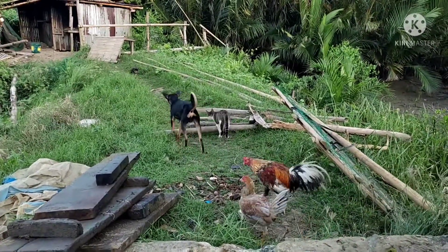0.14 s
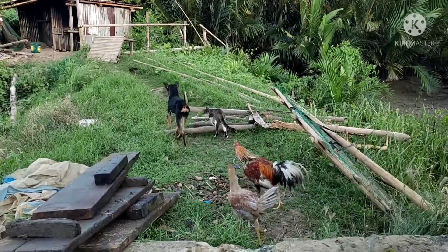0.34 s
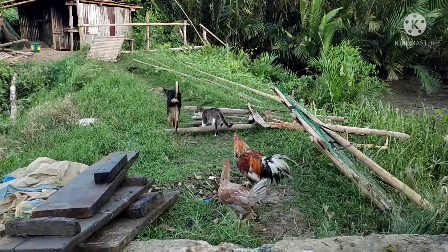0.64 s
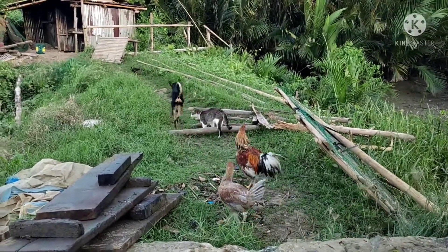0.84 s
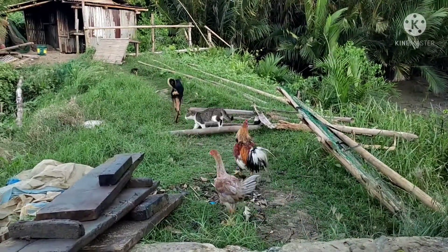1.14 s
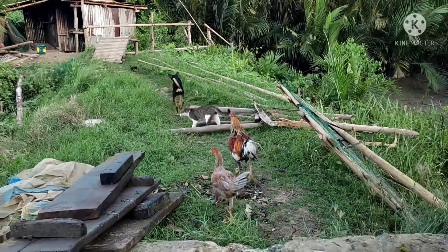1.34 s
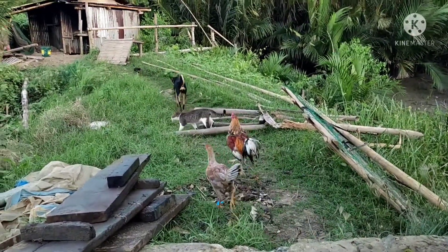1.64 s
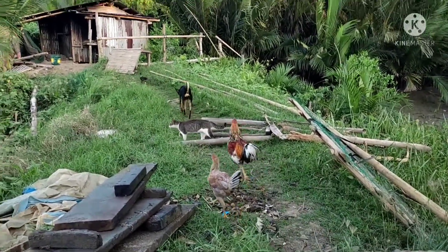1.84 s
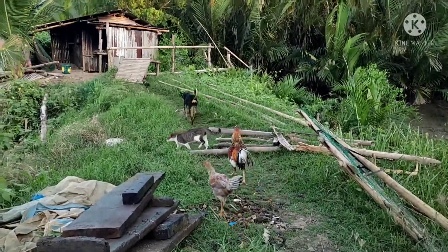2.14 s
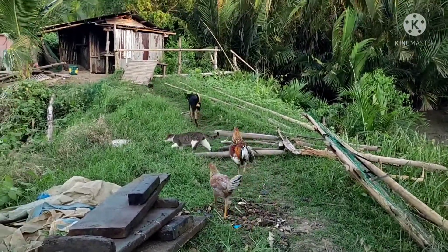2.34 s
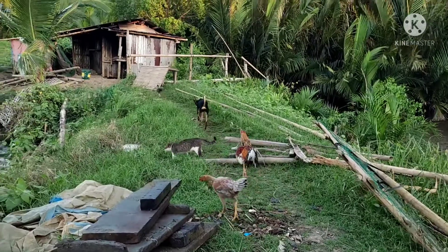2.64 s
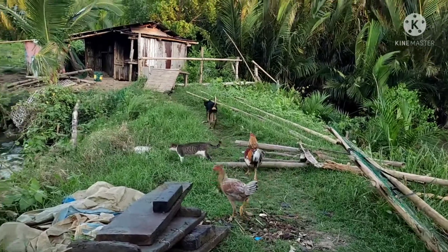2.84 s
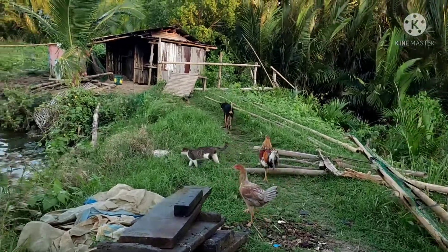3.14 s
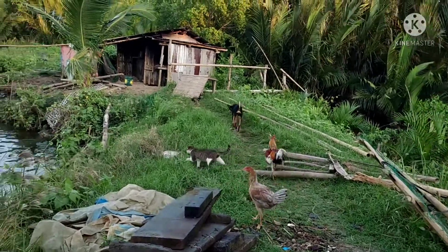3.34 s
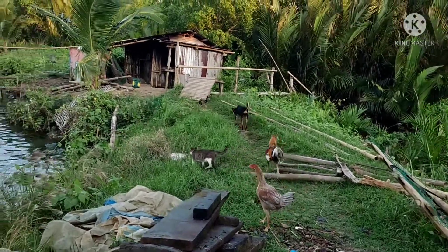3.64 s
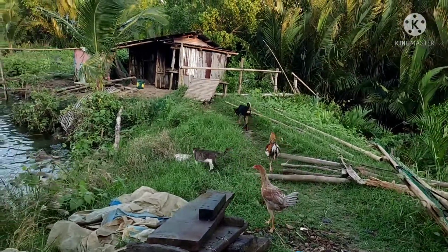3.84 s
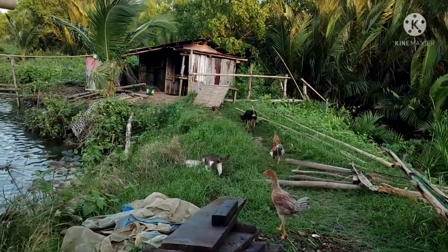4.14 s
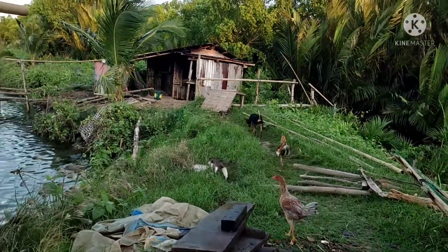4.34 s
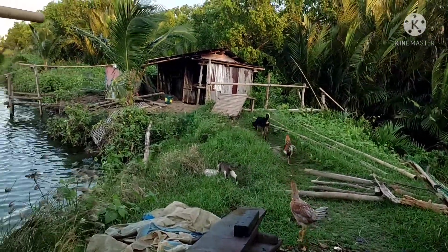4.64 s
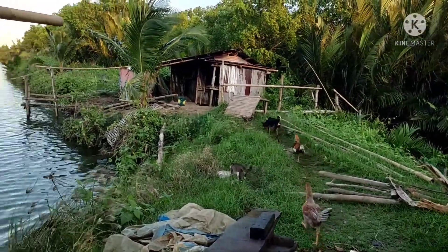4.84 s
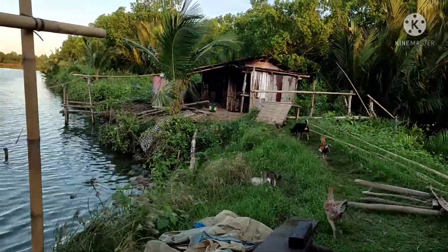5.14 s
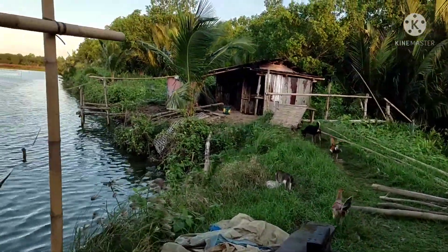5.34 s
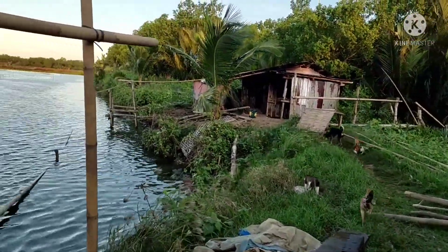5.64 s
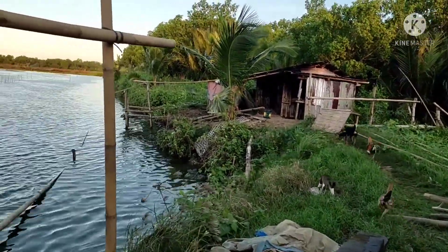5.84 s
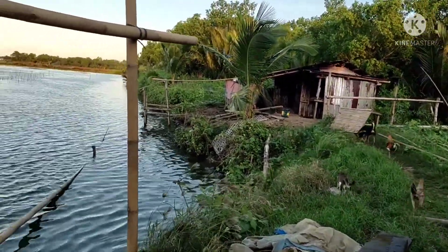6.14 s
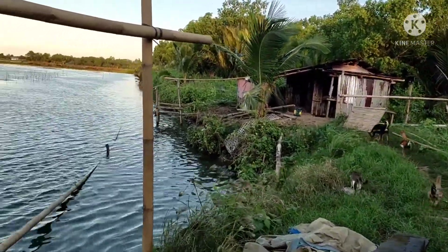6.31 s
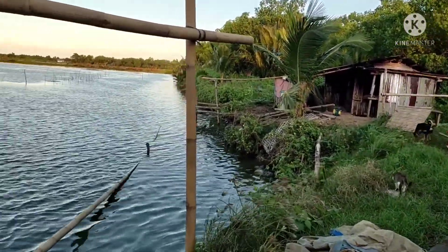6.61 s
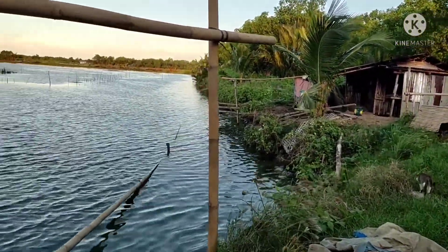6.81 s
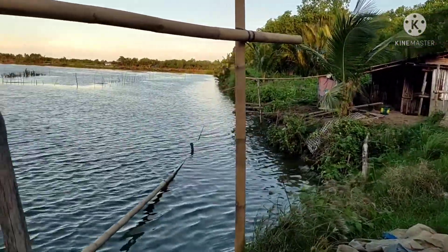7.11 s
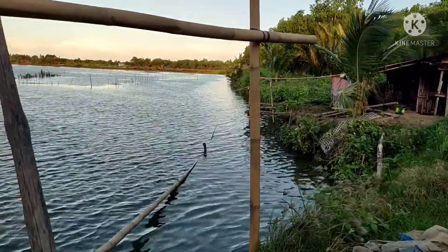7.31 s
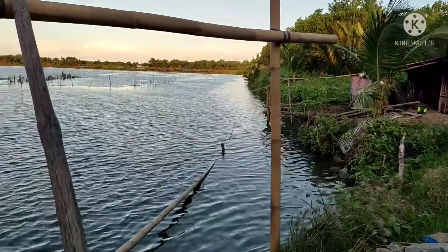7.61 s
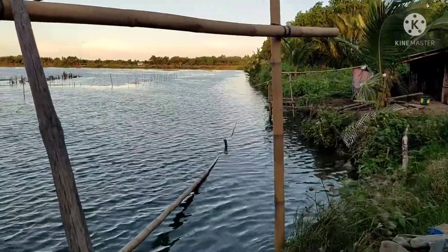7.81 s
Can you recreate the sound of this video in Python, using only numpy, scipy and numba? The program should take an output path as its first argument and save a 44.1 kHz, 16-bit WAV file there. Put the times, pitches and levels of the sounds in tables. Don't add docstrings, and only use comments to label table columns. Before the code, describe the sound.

From the first moment to the end at about 8 seconds, water rushes without a break through an open pond gate some metres away. Its body is a bubbly, hollow mid-low roar, with brighter splashing and fine spray hiss above, shaken by small quick surges. Wind presses on the bare phone microphone all along: deep rumbling, fluttering and irregular soft thumps several times a second, with a stronger gust around 1.5 seconds and heavy bumps near 3.3 and 6.2. Wet gulps of trapped air are sparse at first, clearer at 3.5 and 4.1, then crowd together from 5 to 7 seconds. The flow swells briefly near 3.4 and 5.9. From about 4 seconds the phone turns away, softening the splash by degrees while higher wind flutter grows a little. Far behind, insects blend into a faint, very high throbbing shrill. Open air, only short nearby reflections, no ending.

```python
import sys
import numpy as np
from scipy import signal
from scipy.fft import rfft, irfft, next_fast_len
from scipy.io import wavfile
from scipy.ndimage import uniform_filter1d
from numba import njit

SR = 44100
rng = np.random.default_rng(int(sys.argv[2]) if len(sys.argv) > 2 else 0)


def dump_mix(stems):
    frames = np.atleast_2d(stems).T
    limited = np.clip(frames, -1, 1)
    pcm = np.round(limited * 32767).astype(np.int16)
    wavfile.write(sys.argv[1], SR, pcm)


def boost_factor(decibels):
    exponent = np.asarray(decibels, float) / 20
    return 10 ** exponent


N = 351477

# t/s, turn/0-1
PHONE_TURN = [(0, 0.01), (.4, 0.11), (.9, 0.07), (1.9, 0.09), (2.7, 0), (3.6, 0.03), (4.4, 0.23), (5, 0.37),
              (5.6, 0.56), (6.1, 0.75), (6.7, 0.83), (7.3, 0.99), (7.97, 1)]

# t/s, level/dB
GATE_FLOW = [(0, 1), (0.5, -1.5), (1.2, 0.5), (2, 0.7), (3.1, -1.5), (3.4, 3.5), (3.9, 0.9), (4.6, 2.2),
             (5.5, 0), (5.85, 3), (6.4, 0.5), (6.9, 1.5), (7.4, -1), (7.97, -0.7)]
# t/s, level/dB
SLOSHES = [(0.47, -12), (0.71, 2), (0.86, -10), (1.46, 4.1), (1.64, -6), (1.8, 1.5), (1.94, -1), (2.09, -3),
           (2.57, -16), (2.74, 7), (3.1, -7), (3.28, 5), (3.65, -5), (3.86, 5.5), (4.43, -8), (4.67, -2.5),
           (5.01, -16), (5.18, 1.5), (5.62, -16), (5.98, -10), (6.2, 1.5), (7.06, 7), (7.23, -2), (7.53, 5),
           (7.67, -5), (7.77, 6)]
# t/s, level/dB
HEAVES = [(0.3, 1), (0.76, 3), (0.94, -3), (1.09, 2.5), (1.28, -1), (1.65, -2), (3.04, 2.5), (3.84, -2.8),
          (4.12, 2.5), (4.35, -0.5), (4.57, 1.5), (5.82, -2), (6.3, 2.8), (6.41, -0.8), (6.52, 2.5),
          (6.63, -2.5), (6.82, -0.5), (7.13, -1), (7.45, 1.5), (7.73, -2)]
# t/s, level/dB
SLAPS = [(.1, -2.5), (.5, -2), (.78, 1), (1.5, 0.5), (1.77, -3), (2.0, 1.5), (2.3, 0.5), (2.61, 2.5),
         (2.85, 1.5), (3.1, 1.5), (3.27, -1), (4.24, 1.5), (4.79, 0), (4.89, -3), (5.36, 0), (5.58, -0.5),
         (5.81, 1.5), (6.11, 0), (6.41, -0.5), (6.62, 0.5), (6.71, -1), (7.29, 0), (7.39, 5.5), (7.65, -1),
         (7.88, 2.5)]
# f/Hz, level/dB per Hz
ROAR_COLOUR = [(380, -12), (470, -5.5), (560, 1), (700, 1.5), (900, -1), (1050, -3.5), (1400, -9.5),
               (2000, -44)]
# f/Hz, level/dB per Hz
HOLLOW_COLOUR = [(465, -30), (504, -5), (523, 0), (543, -5), (585, -30)]
# f/Hz, level/dB per Hz
UPPER_HOLLOW_COLOUR = [(680, -30), (710, -5), (724, 0), (740, -5), (775, -30)]
# f/Hz, level/dB per Hz
SPLASH_COLOUR = [(800, -20), (1100, -2), (1300, 0.5), (1800, -1.5), (2300, -5), (2700, -12.5), (2800, -15),
                 (3600, -28)]
# f/Hz, level/dB per Hz
SPRAY_COLOUR = [(1500, -21), (2200, 7), (3000, 2.5), (3300, 4.5), (3540, 6.5), (3565, .5), (4800, -1.5),
                (5800, 0.5), (6200, -12.5)]
# t/s, centre f/Hz, depth/0-1
HAND_SHADE = [
    (0, 3950, 0),
    (2, 3930, 0.1),
    (3.5, 4080, .4),
    (4.7, 4690, 0.5),
    (5.7, 5280, 0.4),
    (6.5, 5270, 0.5),
    (7.97, 5060, 0.5),
]
# t/s, peak level/dB, f/Hz
GULPS = [(0.13, -28, 650), (0.961, -23, 520), (1.891, -21.5, 776), (1.994, -30.5, 670), (2.107, -20, 735),
         (2.459, -26, 550), (2.923, -22, 715), (3.288, -18.5, 540), (3.524, -16, 513), (3.686, -23, 720),
         (4.096, -14.5, 594), (4.385, -24, 616), (4.489, -16, 940), (4.697, -22, 576), (5.088, -19, 583),
         (5.3, -21, 725), (5.388, -18, 860), (5.578, -17, 870), (5.639, -37.5, 660), (5.733, -21, 577),
         (5.8, -18, 543), (5.838, -14, 595), (5.943, -19, 610), (5.985, -23.5, 534), (6.291, -19.5, 570),
         (6.493, -15.5, 560), (6.738, -19, 630), (6.825, -19, 627), (7.045, -26, 520), (7.63, -24, 700),
         (7.78, -25, 560), (7.9, -21, 640)]
# delay t/s, signed gain/1
ECHOES = [(.00342, .1), (.00459, -.12), (.00576, .06), (.00634, -.06), (.00765, .09), (.00962, .12)]

# centre f/Hz, level/dB, response/dB per breeze dB, change at full turn/dB
WIND_LAYERS = [
    (65, -34, 1.06, -4),
    (124, -30, 0.65, -0.86),
    (256, -39, 1.47, 3.5),
    (385, -45, 0.66, 4.5),
]
# t/s, level/dB
BREEZE = [(0, 0.0), (0.9, -1.5), (1.15, -0.5), (1.5, 6), (2.1, -2.6), (2.6, 0), (3.35, 1), (3.75, -1.5),
          (4.2, -1), (4.7, -3.5), (5.3, -1.7), (6.2, 1.0), (7.2, -1.5), (7.5, -1), (7.97, -0.4)]
# t/s, level/dB, eddy f/Hz, length t/s
GUSTS = [(0.18, 4, 60, 0.04), (0.22, 4.5, 320, 0.034), (0.59, 9, 210, 0.038), (0.75, 7, 170, 0.021),
         (1.002, 3.5, 60, 0.061), (1.34, 2, 320, 0.08), (1.385, 7.5, 90, 0.037), (1.77, 6, 60, 0.027),
         (2.073, 6, 110, 0.027), (2.193, 5, 60, 0.04), (2.44, 8, 209, 0.026), (2.58, 1.5, 135, 0.059),
         (2.747, 0.5, 200, 0.051), (0.036, 2.5, 150, 0.044), (2.85, 6.5, 75, 0.047),
         (3.305, 5.5, 60, 0.042), (3.53, 7.5, 400, 0.032), (3.805, 3, 110, 0.066), (4.01, 2.5, 60, 0.084),
         (4.34, 3, 135, 0.14), (4.817, 7.5, 260, 0.09), (4.97, 6.5, 110, 0.057), (5.275, 7.5, 60, 0.048),
         (5.863, 3.5, 135, 0.098), (6.13, 8, 90, 0.035), (6.51, 6.5, 170, 0.024), (7.008, 5.5, 318, 0.092),
         (7.494, 8.5, 170, 0.04), (7.58, 3, 60, 0.055), (0.13, 6, 200, 0.046), (0.95, 4, 140, 0.073),
         (1.32, 1, 400, .05), (3.19, 4.5, 200, .05), (3.344, 2, 200, .04), (3.532, 6, 60, 0.038),
         (4.02, 3, 290, .05), (4.3, 2, 290, 0.041), (5.333, 2, 290, 0.033), (5.52, 4, 60, .05),
         (5.777, 2, 290, .05), (6.74, 5, 400, .05), (7.163, 5, 400, 0.037), (7.25, 4, 62, .05),
         (7.34, 4.5, 200, .05), (7.87, 2, 60, 0.052)]
# t/s, level/dB, eddy f/Hz,
# length t/s
LULLS = [(0.06, -10, 136, 0.023), (0.77, 0, 60, 0.04), (0.91, -6.5, 135, 0.044), (1.32, -5.5, 76, 0.16),
         (1.492, -7.5, 60, 0.026), (1.635, -1.5, 323, 0.034), (2.003, -1.5, 60, 0.04),
         (2.23, -0.5, 206, 0.06), (2.288, -5, 60, 0.043), (2.71, -6.5, 208, 0.022), (3.104, -1, 400, 0.04),
         (3.114, -4, 110, 0.033), (3.647, -2, 320, 0.036), (3.725, -6, 60, 0.036), (3.94, -4, 260, 0.047),
         (4.275, 3, 59.6, 0.04), (4.437, -11, 260, 0.023), (4.7, -3, 75, 0.16), (5.09, -6.5, 90, 0.04),
         (5.596, -4.5, 400, 0.055), (6.012, -10.5, 133, 0.033), (6.037, -5, 320, 0.027),
         (6.257, 4, 60, 0.037), (6.39, -3, 400, 0.038), (6.68, -4, 210, 0.096), (6.83, -2, 60, 0.04),
         (7.0, -6, 60, 0.033), (7.43, 1, 59.6, 0.04), (7.675, -4, 170, 0.079), (0.11, -6, 95, 0.046),
         (1.46, -2, 200, .06), (2.05, -1, 290, 0.045), (2.9, -1.5, 290, 0.044), (3.224, -2, 95, .04),
         (5.1, -1, 290, .04), (5.67, -3, 200, 0.038), (6.205, -1.5, 200, 0.043), (7.08, -1.5, 290, 0.041),
         (7.49, -2, 100, .04), (7.85, 0, 290, 0.054)]
# f/Hz, level/dB per Hz
BUFFET_COLOUR = [(15, -47), (22, -37.5), (33, -22.5), (52, -3.5), (75, 1), (95, -6.5), (130, -26.5)]
# f/Hz, level/dB per Hz
RUMBLE_COLOUR = [(55, -29), (80, -1), (100, 0.5), (129, 1), (200, -4), (260, -13.5), (340, -28)]
# f/Hz, level/dB per Hz
FLUTTER_COLOUR = [(150, -14.5), (215, 5.5), (260, 1), (320, 0.5), (400, -27)]
# f/Hz, level/dB per Hz
WHIR_COLOUR = [(270, -24), (335, -2.5), (400, -4.5), (460, -3), (560, -30)]
# t/s, peak level/dB, f/Hz
THUMPS = [(0.168, -17, 81), (0.44, -14.5, 110), (0.581, -20.5, 217), (0.653, -17.5, 110), (0.75, -21, 140),
          (0.894, -20, 78), (1.021, -17, 89), (1.376, -18.1, 94), (1.643, -13.5, 92), (1.769, -13.5, 65),
          (2.068, -15.5, 133), (2.2, -16.5, 74.5), (2.445, -13, 118), (2.549, -16, 96.5),
          (2.622, -14.5, 135), (2.789, -15.5, 86.4), (2.842, -15.5, 120), (2.918, -20, 110),
          (3.032, -17, 116), (3.348, -12, 95), (3.5, -14, 119), (3.814, -18.5, 105), (3.978, -19, 123),
          (4.273, -15.5, 113), (4.536, -18, 95), (4.69, -18.5, 173), (4.952, -16, 97), (5.004, -20.7, 110),
          (5.163, -21.8, 118), (5.247, -21.5, 124), (5.601, -20, 128), (5.731, -18, 96), (5.865, -15, 104),
          (6.088, -17, 94), (6.157, -12.5, 111), (6.256, -16, 139), (6.47, -16, 136), (6.523, -14.5, 111),
          (6.692, -18, 124), (6.87, -19, 102), (7.121, -20, 83), (7.24, -19, 167), (7.399, -15, 140),
          (7.526, -13.5, 129), (7.805, -20.5, 125), (7.894, -21, 118)]

# t/s, level/dB
CHORUS_LEVEL = [(0, -49.9), (1, -50), (1.6, -49.5), (2, -51), (3.3, -49.5), (4.4, -49.5), (4.9, -51.5),
                (5.6, -49.5), (6.4, -48), (6.8, -49.5), (7.25, -49.1), (7.6, -52.5), (7.97, -51.5)]
# t/s, level/dB
UNISON = [(0.5, -3.5), (0.71, -2.2), (0.92, -3.5), (0.99, 2.0), (1.11, 1.5), (1.67, 4), (1.77, -3),
          (2.3, 3.5), (3.09, 2), (4.53, -3), (4.61, 3.5), (5.1, 3), (5.19, -3.5), (6.38, 2), (6.46, -3.5),
          (6.65, 2), (6.74, -1), (7.15, -1), (7.21, 5), (7.79, -4)]
# f/Hz, level/dB per Hz
SHRILL_COLOUR = [(5810, -40), (5865, -8.5), (6400, -5), (7000, -2), (7450, 0), (7535, -2), (7580, -30),
                 (7660, -60)]
# f/Hz, level/dB per Hz
FAINT_HISS_COLOUR = [(11000, -30), (11050, -5), (11700, -5), (11750, 0), (15450, 0), (15500, -4), (15740, -4),
                     (15760, -30)]

ROAR_DB, RING_DB, UPPER_RING_DB, SPLASH_DB, SPRAY_DB = -37.5, -56, -55.5, -39.5, -54
UPPER_RING_TURN_DB, SPLASH_TURN_DB, SPRAY_TURN_DB = -9, -11, 1.5
SLOSH_S, HEAVE_S, SLAP_S, UNISON_S = 0.026, 0.04, 0.024, 0.013
EDDY_OCTAVES = 0.54
CLEAR_DB, CLEAR_S = -5, 0.014
THUMP_CYCLES, THUMP_DB, SNAP = 0.56, -3.5, 0.3
LOW_SINGERS_DB, LOW_TURN_DB = 0, -5.5


def water():
    (flow,), (turn,), (chorus_db,) = columns(GATE_FLOW), columns(PHONE_TURN), columns(CHORUS_LEVEL)
    slosh, heave, slap = swells(SLOSHES, SLOSH_S), swells(HEAVES, HEAVE_S), swells(SLAPS, SLAP_S)
    far = chorus_db - CHORUS_LEVEL[0][1]
    surge = walk(18)

    large = bubbles(303.2, 1983.0, cycles=31.7, spread_db=1.5, noise_db=-2.5, count=9000)
    roar = colour(large * boost_factor(1.0 * surge + 0.28 * walk(30)), ROAR_COLOUR)
    roar = even(roar, span_s=0.079, share=0.64)
    hollow = even(colour(large, HOLLOW_COLOUR), span_s=0.14, share=0.67)
    upper_hollow = even(colour(large, UPPER_HOLLOW_COLOUR), span_s=0.15, share=0.6)

    small = bubbles(805.5, 3538.0, cycles=39.0, spread_db=2.5, noise_db=-1.5, count=16000)
    splash = colour(small * boost_factor(1.2 * surge + 0.19 * walk(14)), SPLASH_COLOUR)
    splash = even(splash, span_s=0.083, share=1.0)

    fizz = bubbles(1560.0, 5870.0, cycles=12.0, spread_db=1.5, noise_db=-3.0, count=24000)
    spray = colour(fizz * boost_factor(0.59 * surge + 0.7 * walk(30)), SPRAY_COLOUR)
    spray = even(shade(spray, width_hz=1100), span_s=0.11, share=0.49)

    roar_db = ROAR_DB + 0.72 * flow + 0.082 * slosh + 0.82 * heave
    ring_db = RING_DB + 2.9 * flow + 2.2 * slosh
    upper_db = UPPER_RING_DB + UPPER_RING_TURN_DB * turn + heave
    splash_db = SPLASH_DB + SPLASH_TURN_DB * turn + 0.19 * flow + 0.11 * heave + slap
    spray_db = SPRAY_DB + SPRAY_TURN_DB * turn - 0.2 * flow + 0.4 * far + 0.44 * slap
    deep = level(roar, roar_db) + level(hollow, ring_db) + level(upper_hollow, upper_db)
    return deep + level(splash, splash_db) + level(spray, spray_db)


def bubbles(lo_hz, hi_hz, cycles, spread_db, noise_db, count):
    when, pitch, length, strength = rng.random((count, 4)).T
    hz = lo_hz * (hi_hz / lo_hz) ** pitch
    size = hz * boost_factor(-spread_db * np.log(1 - 0.995 * strength))
    swarm = ring((when * N).astype(np.int64), hz, cycles * (0.5 + length), 0.078, size)
    share = (hi_hz - lo_hz) / (SR / 2)
    return level(swarm, 0) + level(noise(), noise_db) / np.sqrt(share)


@njit
def ring(at, hz, cycles, glide, size):
    out = np.zeros(N + 4096)
    for k in range(len(at)):
        span = min(int(cycles[k] * SR / hz[k]), 4000)
        step = 2 * np.pi * hz[k] / SR
        wave = size[k] + 0j
        spin = np.exp(1j * step - 5. / span)
        rise = np.exp(1j * step * glide / span)
        for i in range(span):
            wave *= spin
            spin *= rise
            out[at[k] + i] += wave.imag
    return out[:N]


def gulps():
    s, db, hz = np.repeat(np.transpose(GULPS), 8, axis=1)
    late, detune = rng.random((len(s), 2)).T
    at = ((s + 0.015 * late ** 1.806) * SR).astype(np.int64)
    pitch = hz * (0.828 + 0.84 * detune ** 2)
    return ring(at, pitch, np.full(len(s), 15.), 0.11, boost_factor(db - 12.0))


def mirrored(x):
    late = sum(gain * np.roll(x, int(s * SR)) for s, gain in ECHOES)
    return x + signal.sosfiltfilt(signal.butter(2, 1350, fs=SR, output="sos"), late)


def shade(x, width_hz):
    hz, depth = columns(HAND_SHADE)
    shift = np.exp(2j * np.pi * np.cumsum(hz) / SR)
    low_pass = signal.butter(1, width_hz, fs=SR, output="sos")
    band = signal.sosfiltfilt(low_pass, x * shift.conj()) * shift
    return x - np.clip(depth, 0, 1) * 2 * band.real


def wind():
    buffet_db, rumble_db, flutter_db, whir_db = gusting()
    clear = bumps(np.transpose(THUMPS)[0], CLEAR_DB, CLEAR_S)
    eddies = walk(12)
    flutter_shake = boost_factor(1.9 * eddies + 1.8 * walk(40))
    whir_shake = boost_factor(0.33 * eddies + 1.3 * walk(25))

    buffet = even(colour(noise(), BUFFET_COLOUR), span_s=0.074, share=0.75)
    rumble = even(colour(noise() * boost_factor(1.2 * eddies), RUMBLE_COLOUR), span_s=0.11, share=0.87)
    flutter = even(colour(noise() * flutter_shake, FLUTTER_COLOUR), span_s=0.091, share=0.82)
    whir = even(colour(noise() * whir_shake, WHIR_COLOUR), span_s=0.063, share=0.36)

    lurch = even(eddies, span_s=0.6, share=0.9) * 0.11 + walk(7)
    buffet = level(buffet, buffet_db + 0.68 * clear + 0.36 * lurch)
    rumble = level(rumble, rumble_db + clear + 1.2 * lurch)
    flutter = level(flutter, flutter_db + 0.44 * clear + 1.5 * lurch)
    return buffet + rumble + flutter + level(whir, whir_db + 0.68 * lurch)


def gusting():
    (breeze,), (turn,) = columns(BREEZE), columns(PHONE_TURN)
    s, db, hz, length = np.concatenate([GUSTS, LULLS]).T
    levels = []
    for centre, base, response, swing in WIND_LAYERS:
        reach = np.exp(-0.5 * (np.log2(hz / centre) / EDDY_OCTAVES) ** 2)
        levels.append(base + response * breeze + swing * turn + bumps(s, db * reach, length))
    return levels


def thumps():
    s, db, hz = np.transpose(THUMPS)[:, :, None]
    k = np.arange(-2000, 2000)
    turns = k / SR * hz
    swell = boost_factor(db + THUMP_DB) * np.exp(-0.5 * (turns / THUMP_CYCLES) ** 2)
    push = swell * np.cos(2 * np.pi * (turns + rng.random(s.shape)))
    crest = SNAP * boost_factor(db) * np.exp(-0.5 * (3 * turns) ** 2) * np.sin(4.4 * np.pi * turns)
    out = np.zeros(N)
    np.add.at(out, (s * SR).astype(int) + k, push + crest)
    return out


def chorus():
    (high_db,), (turn,) = columns(CHORUS_LEVEL), columns(PHONE_TURN)
    common = 0.32 * walk(35) + 1.1 * walk(90)
    low = colour(noise() * boost_factor(common + 0.25 * walk(22)), SHRILL_COLOUR)
    high = colour(noise() * boost_factor(common + 0.25 * walk(22)), SHRILL_COLOUR)
    low = signal.sosfiltfilt(signal.butter(2, 6800, fs=SR, output="sos"), low)
    high = signal.sosfiltfilt(signal.butter(2, 6800, "high", fs=SR, output="sos"), high)
    throb = walk(13)
    high_db = high_db + swells(UNISON, UNISON_S)
    low_db = high_db + LOW_SINGERS_DB + LOW_TURN_DB * turn + 0.12 * throb
    high = level(even(high, span_s=0.078, share=1.0), high_db + 0.33 * throb)
    return high + level(even(low, span_s=0.17, share=0.8), low_db)


def noise():
    return rng.standard_normal(N)


def level(x, db):
    return x * boost_factor(db) / np.sqrt(np.mean(x ** 2))


def columns(table):
    s, *rest = np.transpose(table)
    return [np.interp(np.arange(N) / SR, s, column) for column in rest]


def colour(x, points):
    size = next_fast_len(N)
    hz, db = np.transpose(points)
    axis = np.log(np.arange(1, size // 2 + 2) * SR / size)
    gain = boost_factor(np.interp(axis, np.log(hz), db, left=-99, right=-99))
    return irfft(rfft(x, size) * gain, size)[:N]


def walk(rate):
    k = int(SR / rate)
    steps = rng.standard_normal(4000)[np.arange(N) // k % 4000]
    smooth = uniform_filter1d(uniform_filter1d(steps, k), k)
    smooth = smooth - uniform_filter1d(smooth, SR // 3)
    return smooth / smooth.std()


def even(x, span_s, share):
    k = int(span_s * SR)
    power = uniform_filter1d(uniform_filter1d(x ** 2, k), k)
    return x / (power + 1e-18) ** (np.clip(share, 0, 1) / 2)


def bumps(s, db, length_s):
    t = np.arange(0, N + 64, 64) / SR
    coarse = (db * np.exp(-0.5 * ((t[:, None] - s) / length_s) ** 2)).sum(axis=1)
    return np.interp(np.arange(N) / SR, t, coarse)


def swells(table, length_s):
    s, db = np.transpose(table)
    return bumps(s, db, length_s)


def scene():
    return (mirrored(water()) + gulps() + wind() + thumps() + chorus())[None]


def top_cut(x):
    return signal.sosfilt(signal.butter(12, 15800, fs=SR, output="sos"), x)


def record(dry):
    steep = signal.ellip(10, 0.05, 50, 7680, fs=SR, output="sos")
    cut = signal.sosfiltfilt(steep, dry)
    fade_in = np.clip(0.25 + np.arange(N) / (0.01 * SR), 0, 1)
    hiss = level(colour(noise(), FAINT_HISS_COLOUR), -103)
    return top_cut(cut * fade_in + hiss)


dry = scene()
out = record(dry)
dump_mix(out)
```